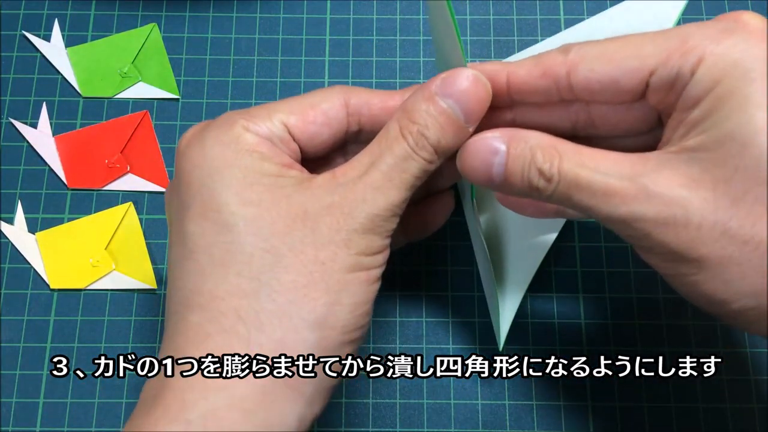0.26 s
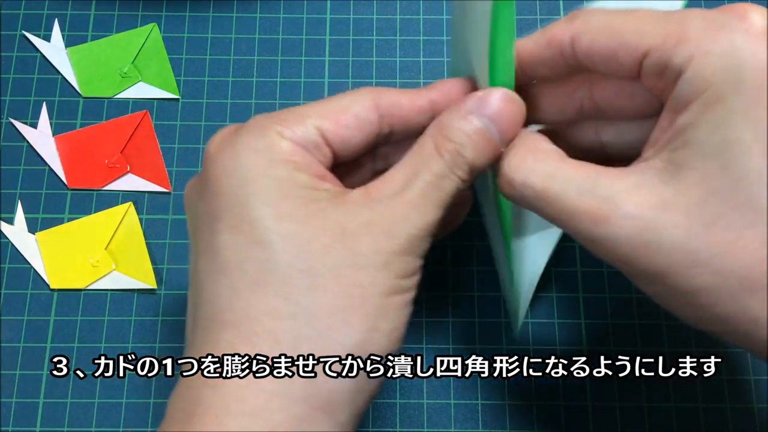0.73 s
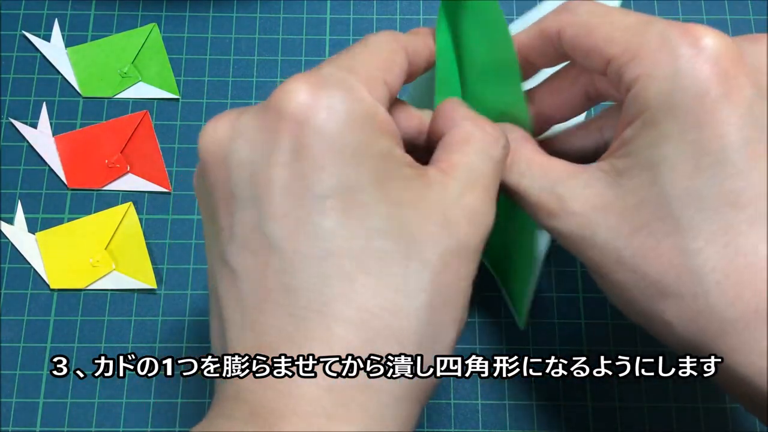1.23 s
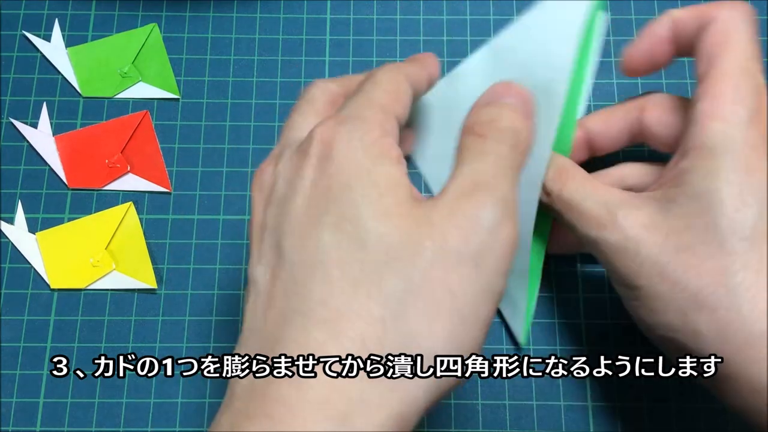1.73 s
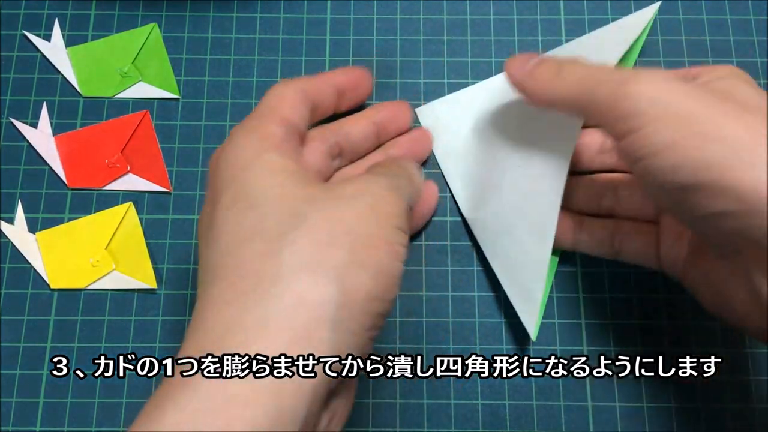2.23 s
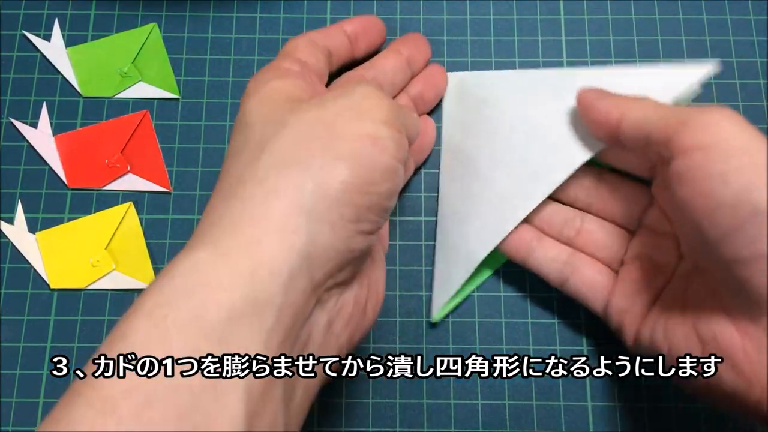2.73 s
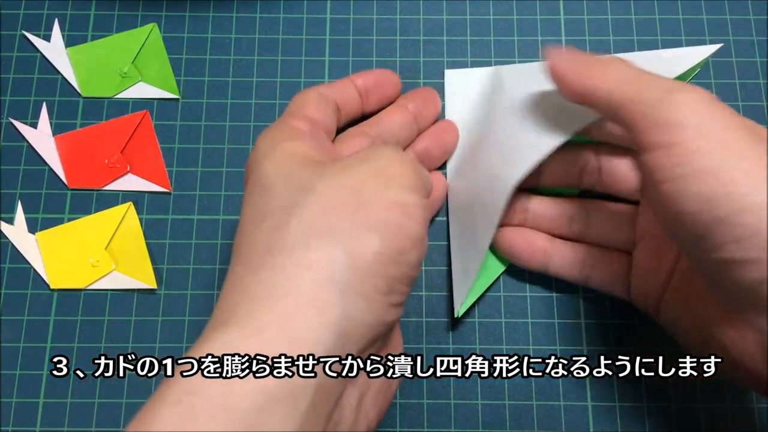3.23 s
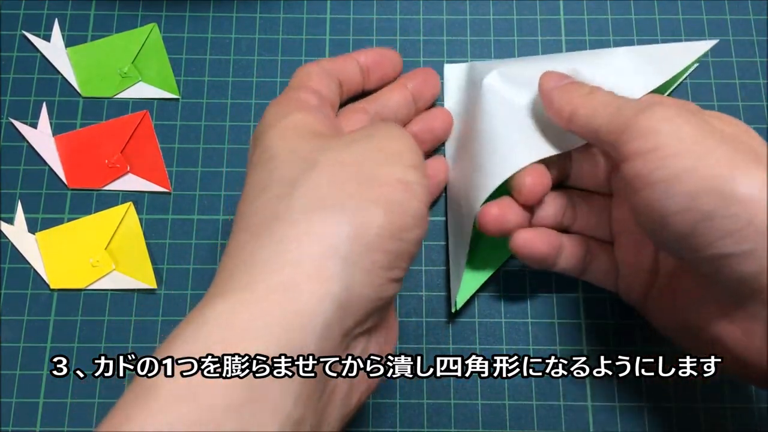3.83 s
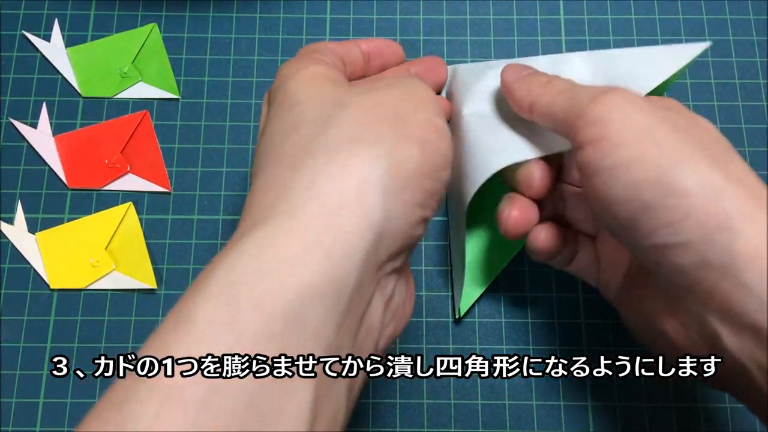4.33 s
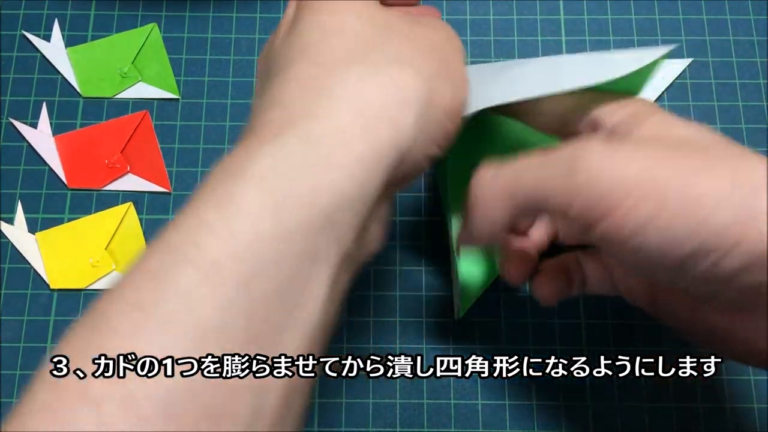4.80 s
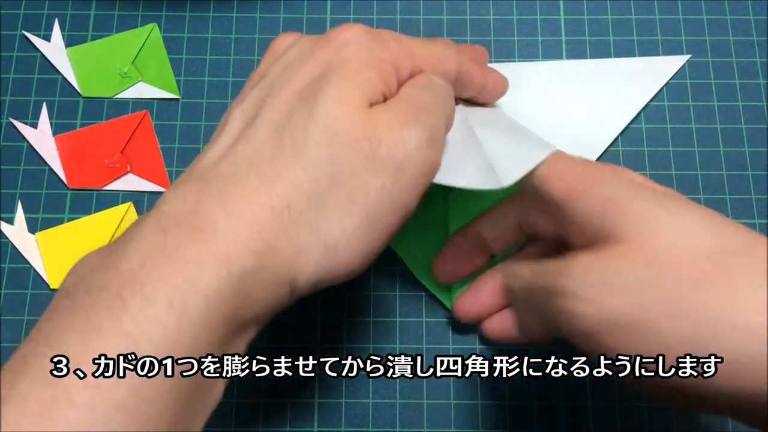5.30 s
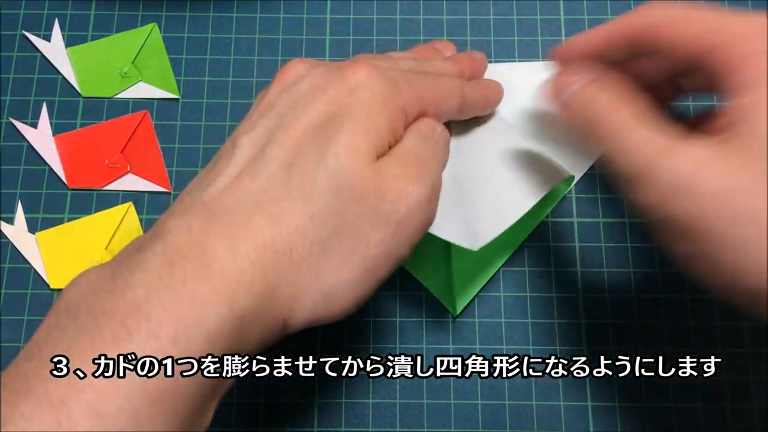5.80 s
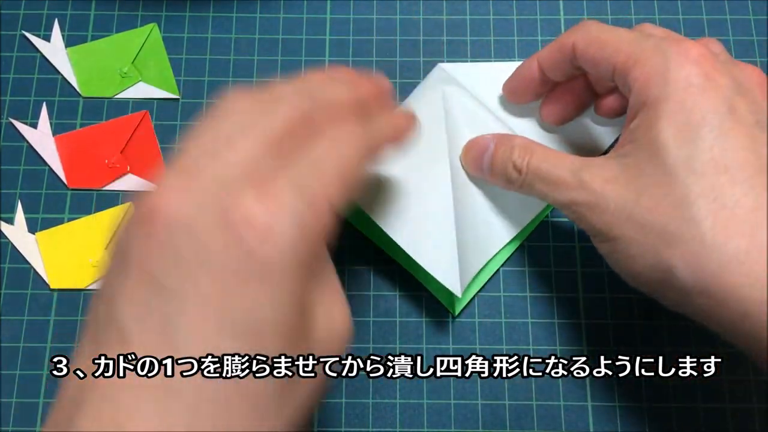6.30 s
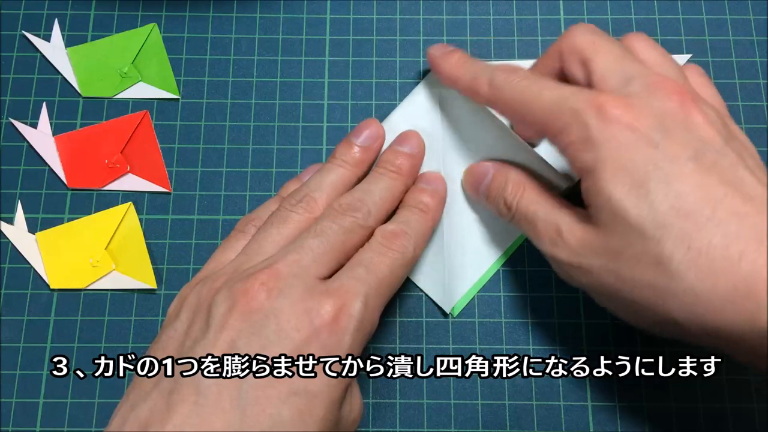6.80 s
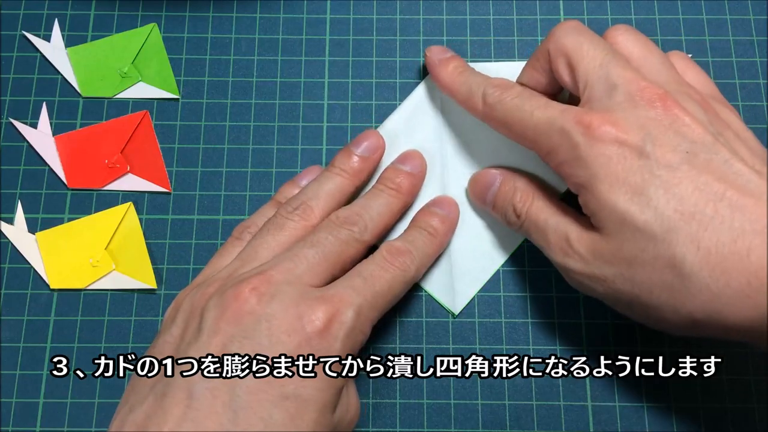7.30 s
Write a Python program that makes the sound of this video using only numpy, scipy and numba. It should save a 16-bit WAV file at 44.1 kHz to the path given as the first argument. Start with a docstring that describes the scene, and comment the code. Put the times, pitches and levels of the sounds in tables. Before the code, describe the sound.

Thin stiff paper crackles and rustles under sliding fingers, popping loudly as folds buckle, then settling into light pressing rubs over faint room hum.

```python
"""A quiet room, close to a desk mat: hands open, squash and crease a small sheet of paper.
Stick-slip friction of sliding fingers, heard as grainy rustles, shakes the modes of the sheet.
Buckling adds sharp snaps: one crack in a dying run of micro-cracks drives the same modes.
Hands press the desk with soft thumps, made as band-passed pushes of noise.
Desk and walls add a short diffuse tail to the paper, over a low hum of shaped noise."""
import sys
import numpy as np
from scipy import signal
from scipy.fft import rfft, irfft
from scipy.io import wavfile
from scipy.ndimage import uniform_filter1d
from numba import njit

SR = 44100
rng = np.random.default_rng(int(sys.argv[2]) if len(sys.argv) > 2 else 0)


def to_wav(s):
    """Save 16-bit WAV."""
    ch = np.atleast_2d(s).T  # columns
    pcm = np.round(np.clip(ch, -1, 1) * 32767)  # PCM
    wavfile.write(sys.argv[1], SR, pcm.astype(np.int16))


N = 332955


def undb(db):
    """Decibel law: amplitude gain of a level in dB."""
    return 10 ** (np.asarray(db) / 20)


def unit(x):
    """Normalisation of power: scale to rms 1."""
    return x / np.sqrt(np.mean(x ** 2))


def walk(rate_hz):
    """Random modulation: levels held for 1 / rate_hz, smoothed by two moving averages, rms 1."""
    hold = int(SR / rate_hz)
    steps = np.repeat(rng.standard_normal(N // hold + 1), hold)
    smooth = uniform_filter1d(uniform_filter1d(steps, hold), hold)
    return unit(smooth[:N])


# Spectrum of the room hum, interpolated over log frequency
# columns: frequency_hz [Hz], relative spectral level_db [dB]
HUM_SPECTRUM = [(30, -22.5), (46, -18), (64, 1), (87, -6), (124, -3.5), (161, -10), (198, -5), (300, -16),
                (900, -17.5), (1800, -18), (2700, -25.5), (5270, -34.5), (15300, -40.5)]
HUM_DB = -61.5


def hum():
    """Stationary noise of room and microphone: white noise shaped in spectrum, its level wavering slowly."""
    frequency_hz, level_db = np.transpose(HUM_SPECTRUM)
    bins_hz = np.fft.rfftfreq(N, 1 / SR)
    gain = undb(np.interp(np.log(bins_hz + 1), np.log(frequency_hz), level_db))
    waver_db = .8 * walk(2)
    noise = irfft(rfft(rng.standard_normal(N)) * gain, N)
    return undb(HUM_DB + waver_db) * unit(noise)


# How the sheet is held, interpolated over time
# columns: start_s [s], level_db of resting contact [dB], boom_db of the pocket over body [dB],
# pitch_hz of the taut panel [Hz], air_db added to the top register [dB]
GRIP = [(0, -93, -8.5, 3500, -2.5), (.8, -73, -5.5, 3100, 4), (1.25, -72, -10.5, 3000, -5.5),
        (1.43, -72, -5.5, 2500, 1.5), (1.7, -74, -2, 2400, 3.5), (1.9, -60, -7.5, 3400, -2),
        (2.6, -61, -13, 3660, 1.5), (2.71, -68, -12.5, 3660, -4), (3.05, -62.5, -5, 3650, -3),
        (3.3, -71, -6.5, 3700, -1.5), (3.5, -71, -18.5, 3200, 0), (3.62, -65.5, -8.5, 2200, -1.5),
        (4.1, -55.5, -2.5, 2100, -1), (4.4, -60, -3.5, 2000, -1.5), (4.56, -77, -2.5, 2450, 2.5),
        (5, -69, -4.5, 2900, 0.5), (5.3, -77.5, -4, 3500, -1), (5.8, -80, -3, 3000, -1.5),
        (6.2, -80, -5.5, 2337, 4.5), (6.6, -83, -4, 2300, 0), (6.8, -70, -12, 2600, -2.5),
        (6.949, -75.5, -14, 3495, -5), (7.05, -76, -12.5, 3040, -2), (7.24, -79, -13.5, 3900, -8.5),
        (7.5, -81, -19, 3100, -0.5)]


def held(t):
    """Changing boundary conditions: resting level, boom, panel pitch and air at the given times."""
    start_s, *columns = np.transpose(GRIP)
    return [np.interp(t, start_s, column) for column in columns]


# Finger strokes over the paper; the swell comes before the hold
# columns: start_s of the hold [s], hold_s [s], level_db of the body [dB], treble_db over body [dB],
# swell_ms [ms per 10 dB], fade_ms [ms per 10 dB]
FINGER_STROKES = [(0.02, .004, -63.5, -10, 12, 11), (0.064, 0.015, -58.5, 0.5, 10, 45),
                  (0.236, .005, -62.5, 6.5, 11, 12), (0.51, .01, -63, -3, 8.5, 56),
                  (0.695, .005, -48, -11, 3.8, 20), (0.787, .01, -62, -10, 13, 16),
                  (0.835, 0.018, -65, 2, 89, 65), (0.938, .005, -51, 3, 28, 68),
                  (1.04, 0.0089, -56, 6, 45, 17), (1.124, 0.033, -53.5, 8, 21, 29),
                  (1.208, 0.077, -53, 6, 49, 82), (1.485, .005, -40.5, -1.5, 99, 11),
                  (1.613, 0.03, -44, -1, 12, 64), (1.77, 0.015, -45.5, 0, 8.4, 51),
                  (1.993, .005, -42.5, 4, 86, 52), (2.188, .005, -46, 8.5, 67, 26),
                  (2.353, .005, -51, 4, 104, 28), (2.475, 0.0059, -50, 3.5, 46, 16),
                  (2.618, 0.14, -50.5, 6.5, 46, 77), (3.093, 0.15, -57, 5.5, 130, 44),
                  (3.345, 0.036, -52.5, 5, 15, 33), (3.389, 0.025, -43.5, -5, 19, 68),
                  (3.491, 0.017, -34, -10.5, 15, 25), (3.534, .015, -38.5, -9.5, 15, 21),
                  (3.593, .018, -35, -11.5, 9.8, 27), (3.638, 0.014, -38.5, -9, 15, 22),
                  (3.684, 0.026, -43.5, -2, 12, 35), (4.04, .005, -56.5, 4, 58, 140),
                  (4.199, 0.013, -58, 14.5, 50, 30), (4.258, 0.063, -45.5, -5, 15, 31),
                  (4.386, 0.056, -57, 0, 25, 25), (4.472, 0.037, -48, -7, 25, 20),
                  (4.569, 0.026, -45, 3, 35, 6), (4.666, 0.013, -58, -13, 12, 12),
                  (4.726, 0.13, -58, -1, 16, 60), (4.972, 0.043, -55, -6, 26, 45),
                  (5.063, .01, -53, -13, 19, 64), (5.204, .005, -60, 0.5, 17, 25),
                  (5.26, 0.39, -55.5, 3, 18, 20), (6.013, 0.0045, -61.5, 8.5, 7.9, 31),
                  (6.137, 0.13, -56, -1, 17, 8.6), (6.298, 0.0088, -61.5, -15, 7.6, 7.2),
                  (6.361, 0.011, -55.5, -12.5, 6.7, 5.1), (6.566, 0.031, -60.5, -12.5, 25, 16),
                  (6.647, 0.018, -52.5, -22, 8.5, 19), (6.789, 0.027, -48.5, 0.5, 62, 12),
                  (6.89, 0.039, -43, -8, 67, 9.1), (6.992, 0.082, -46.5, -6, 12, 14),
                  (7.109, 0.0089, -56, -2, 14, 13), (7.174, 0.025, -62, 7.5, 13, 27),
                  (7.223, 0.033, -54.5, -11, 10, 34), (7.376, 0.017, -62, 9, 12, 7.7),
                  (7.486, .005, -60.5, -8.5, 27, 9.7), (7.549, 0.0055, -67, -4, 18, 18)]
REST_TREBLE_DB = -4  # over the body of the resting contact


def strokes(t, rest_db):
    """Addition of powers: gains of body and treble as strokes swell, hold and fade over resting contact."""
    body_power = undb(rest_db) ** 2
    treble_power = undb(rest_db + REST_TREBLE_DB) ** 2
    for start_s, hold_s, level_db, treble_db, swell_ms, fade_ms in FINGER_STROKES:
        before_s = np.maximum(start_s - t, 0)
        after_s = np.maximum(t - start_s - hold_s, 0)
        drop_db = 10 * 1000 * (before_s / swell_ms + after_s / fade_ms)
        power = undb(level_db - drop_db) ** 2
        body_power = body_power + power
        treble_power = treble_power + power * undb(treble_db) ** 2
    return np.sqrt(body_power), np.sqrt(treble_power)


def grains(size, spread_db):
    """Skewed slip statistics: sizes of dense tiny fibre slips, a few much larger than the rest."""
    return undb(spread_db * rng.exponential(size=size))


@njit
def svf(x, hz, width):
    """Second-order resonance: state-variable band-pass with a moving centre, gain 1 there."""
    y, band, low = np.empty(len(x)), 0., 0.
    for i in range(len(x)):
        g, damping = np.tan(np.pi * hz[i] / SR), width[i] / hz[i]
        v = (band + g * (x[i] - low)) / (1 + g * (g + damping))
        band, low, y[i] = 2 * v - band, low + 2 * g * v, damping * v
    return y


def ring(x, hz, width):
    """Cascaded resonance: the band-pass applied twice for steeper skirts."""
    hz, width = hz + 0 * x, width + 0 * x  # one value per sample
    return svf(svf(x, hz, width), hz, width)


def modes(x, table, sway):
    """Modal superposition with alternating sign; sway() gives each mode its own change of level in dB."""
    total = 0
    for k, (pitch_hz, width_hz, level_db) in enumerate(table):
        mode = unit(ring(x, pitch_hz, 1.234 * width_hz))  # each pass is wider, as two narrow the band
        gain = undb(level_db + sway()) * np.sqrt(width_hz)
        total = total + (-1) ** k * gain * mode
    return total


# Modes of the sheet: the whole sheet, the fibres' treble, their top register, the folded pocket's lows
# columns of each: pitch_hz [Hz], nominal width_hz [Hz], relative level_db per root width [dB]
BODY_MODES = [(1830, 860, 0.5), (2850, 2910, -2.5), (3860, 1220, 3)]
SHEEN_MODES = [(5380, 9050, 6.5), (7120, 5000, 13.5)]
AIR_MODES = [(10200, 7900, 5.5), (14600, 7800, -0.5)]
BOOM_MODES = [(180, 190, -15.5), (347, 95, -3.5), (531, 130, -8), (643, 152, -9), (1157, 580, -0.5)]


def sheet(force, panel_hz, panel_db, air_db, sharp, sway):
    """Forced vibration: three forces drive three registers; the taut panel adds a resonance of Q sharp."""
    whole = unit(modes(force[0], BODY_MODES, sway))
    panel = unit(ring(force[0], panel_hz, panel_hz / sharp))
    body = whole + undb(panel_db + sway()) * panel
    treble = modes(force[1], SHEEN_MODES, sway) + undb(air_db) * modes(force[1], AIR_MODES, sway)
    boom = modes(force[2], BOOM_MODES, sway)
    return unit(body), unit(treble), unit(boom)


FIRM_DB, BOOM_LAG = -54, 0.19  # body level where boom is as listed; dB it lags per dB above


def rustle(t):
    """Stick-slip friction: skin grips and slips in grainy, fluttering force with scattered crackles."""
    rest_db, boom_db, panel_hz, air_db = held(t)
    firm, bright = strokes(t, rest_db)
    hits = rng.random(N) < 300 / SR  # 300 crackles per second on average
    ticks = hits * undb(-11 + np.minimum(4.0 * rng.exponential(size=N), 14))
    crackle = 1 + signal.lfilter([1], [1, -np.exp(-1 / (0.0026 * SR))], ticks)  # each decays in 2.6 ms
    flutter_db = 0.79 * walk(60) + 0.66 * walk(250)
    push = grains(size=N, spread_db=2.0) * undb(flutter_db) * crackle
    force = push * rng.standard_normal((3, N))
    # the bending sheet lets each mode swell and fade on its own
    body, treble, boom = sheet(force, panel_hz, panel_db=-1.0, air_db=air_db, sharp=2.6,
                               sway=lambda: 2.3 * walk(35))
    boom_gain = undb(boom_db) * (firm / undb(FIRM_DB)) ** -BOOM_LAG
    return firm * (body + boom_gain * boom) + bright * treble


# Buckling snaps
# columns: start_s [s], level_db of the body [dB], treble_db over body [dB],
# pitch_hz of the ringing panel [Hz], length_ms, the time scale of the run [ms]
BUCKLES = [(0.0756, -47.5, 3, 4470, 11), (0.144, -50, -4, 4600, 11), (0.157, -44, -10, 4250, 8.5),
           (0.3685, -66, 18.5, 5100, 3), (0.4687, -55, 13, 4580, 3.9), (0.5172, -42, 7, 4320, 4.4),
           (0.572, -67.5, 21, 4900, 4.6), (0.5918, -35.5, 0.5, 4670, 4.6), (0.608, -47, -2, 5030, 3.4),
           (0.627, -48, 6, 4300, 2.6), (0.635, -48, 0, 4260, 7.5), (0.6768, -47.5, 5, 4500, 2.7),
           (0.6987, -43, -17, 1870, 5.4), (0.728, -51, -5, 1310, 12), (0.845, -43.5, -17, 960, 3.5),
           (0.9336, -40, 0, 2420, 12), (0.981, -47.5, 2, 4150, 13), (0.993, -39, 10, 5700, 2.6),
           (1.0363, -37.5, -5, 1160, 10), (1.053, -22.5, -11, 3380, 1.6), (1.106, -32.5, -12, 3930, 4.7),
           (1.1403, -27, -5.5, 4420, 6), (1.2355, -21, 0.5, 6000, 6.6), (1.277, -31, -1.5, 4070, 3.5),
           (1.315, -38, -35, 900, 17), (1.3366, -29, 3.5, 4300, 3.6), (1.3498, -31.5, -14, 4450, 3.6),
           (1.4112, -19, -3, 1900, 4.2), (1.4327, -13.5, -9, 4000, 2.8), (1.4437, -12.5, 2, 1980, 3.1),
           (1.4543, -23.5, -5, 1700, 7.2), (1.534, -42, 11.5, 3520, 2.3), (1.5731, -44, -9, 3220, 9.7),
           (1.6772, -26, -22, 1090, 2.9), (1.7861, -32.5, -30, 2090, 15.5), (1.825, -42, -30, 920, 11),
           (1.9857, -30, -1, 3150, 32), (2.0, -25.5, 1, 4300, 6.5), (2.03, -32, -1, 3500, 2),
           (2.0506, -22.5, -1.5, 4540, 12.8), (2.117, -46, 3, 3500, 10), (2.129, -33.5, -37, 1080, 5.3),
           (2.191, -37, -24, 3020, 10), (2.2093, -26.5, -2.5, 2600, 14), (2.33, -36, 14.5, 3830, 1.2),
           (2.3385, -25.5, 6.5, 3600, 1.8), (2.6067, -40, 18, 4240, 0.91), (2.619, -51, 15, 3220, 4),
           (2.654, -50.5, 16.5, 4500, 2.2), (2.707, -12, -1.5, 3400, 3.7), (2.717, -9, -7, 3670, 3.6),
           (2.7801, -30, -20, 3700, 10), (2.837, -21, -37, 3280, 2.6), (2.928, -38, -35, 1180, 4.2),
           (3.0266, -30.5, -28, 3300, 5.3), (3.0385, -22, -31, 4060, 2.6), (3.0441, -21, -6, 3370, 5.1),
           (3.0559, -29.5, -13, 1150, 10), (3.2365, -19, 4, 4030, 3.9), (3.7441, -29, -31, 2000, 5.5),
           (3.768, -39, -24, 2100, 6.4), (3.885, -44, -29, 1800, 4.8), (3.9058, -39.5, -23, 2320, 2.4),
           (3.981, -43, -22, 1870, 4.9), (4.038, -45, 7.5, 4400, 26), (4.124, -28.5, -42, 1900, 8.8),
           (4.1521, -37.5, -19, 1070, 9.5), (4.236, -42, -22, 2900, 4.6), (4.254, -26.5, -28, 3000, 6.3),
           (4.2769, -27.5, -7, 2960, 4.4), (4.335, -36, -8, 1420, 3.9), (4.3607, -32.5, -12, 2330, 10.6),
           (4.4513, -39, -21, 1340, 17), (4.459, -42, 13.5, 1150, 1.9), (4.473, -23.5, -14, 2030, 6.2),
           (4.495, -37, -25, 2000, 5), (4.511, -38, -25, 1890, 8.4), (4.545, -45, 9, 5200, 5.4),
           (4.5565, -7.5, -2.5, 2720, 3.7), (4.725, -46.5, -19, 3420, 4), (4.801, -48.5, -20, 2000, 17),
           (4.8315, -34, -15, 1060, 2.7), (4.869, -32, -19, 1070, 9.7), (4.877, -25.5, -8, 3240, 9.8),
           (4.888, -33, -0.5, 3060, 10), (5.1356, -57.5, 11, 5750, 21), (5.245, -23.5, -2, 4650, 7.5),
           (5.29, -42.5, 6, 1120, 2.4), (5.4376, -27, -9, 1200, 0.4), (5.572, -45, -25, 1070, 12),
           (5.6238, -22.5, -9, 1110, 6.8), (6.52, -47, -31, 3004, 2.6), (6.6951, -26, -33, 2100, 3.5),
           (6.9517, -17, -4.5, 1107, 3.2), (7.2604, -34, -20, 1260, 6.9), (7.2671, -16.5, -0.5, 2600, 2.7),
           (7.333, -45, -7, 2960, 8)]
CRACK_S, CRACK_DB = .0006, 15.5  # main crack: delay in s, and size over a unit of micro-crack force
# a snap's boom over that of the pocket for a 2500 Hz panel; small, high panels boom less
SNAP_BOOM_DB, BOOM_DB_PER_OCTAVE = -1, -2


def snaps():
    """Buckling instability: one strong crack in a sudden, dying run of micro-cracks; the pocket booms along."""
    out, t = np.zeros(N + SR), np.arange(SR // 16) / SR
    for start_s, level_db, treble_db, pitch_hz, length_ms in BUCKLES:
        age = 1000 * t / max(length_ms, .5)
        rise = 1 - np.exp(-age / 0.025)  # longer runs also start more softly
        fade = rise * np.exp(-1.4 * age)
        force = fade * grains(size=len(t), spread_db=2.0) * rng.standard_normal((3, len(t)))
        force[:, int(CRACK_S * SR)] = undb(CRACK_DB)
        _, pocket_db, _, air_db = held(start_s)
        body, treble, boom = sheet(force, pitch_hz, panel_db=1.0, air_db=air_db, sharp=3.1, sway=lambda: 0)
        boom_db = pocket_db + SNAP_BOOM_DB + BOOM_DB_PER_OCTAVE * np.log2(pitch_hz / 2500)
        mix = body + undb(treble_db) * treble + undb(boom_db) * boom
        i = int(start_s * SR)
        out[i:i + len(t)] += undb(level_db) * np.sqrt(np.mean(fade ** 2)) * mix
    return out[:N]


# Hands landing or dragging on the desk
# columns: start_s [s], level_db [dB], pitch_hz of the dull band [Hz], push_ms from start to peak [ms]
DESK_THUMPS = [(1.44, -71, 171, 11), (1.79, -45, 284, 14), (2.145, -50, 122, 7.6), (2.777, -51.5, 153, 24),
               (4.121, -52, 120, 8.9), (4.555, -54, 170, 11), (4.77, -53, 149, 23), (4.871, -53, 121, 23),
               (4.94, -51, 201, 41), (5.059, -45, 182, 7.2), (5.286, -48, 317, 3.9),
               (6.008, -51, 147.5, 9.7), (6.167, -53.5, 330, 7.3)]


def thumps(t):
    """Damped forced vibration: soft pushes of a palm shake the desk top in a dull band."""
    out, span = np.zeros(N + SR), t[:SR // 4]
    for start_s, level_db, pitch_hz, push_ms in DESK_THUMPS:
        age = 1000 * span / push_ms
        push = age * np.exp(1 - age)  # peaks at 1
        shake = ring(push * rng.standard_normal(len(span)), pitch_hz, 1.1 * pitch_hz)
        i = int(start_s * SR)
        out[i:i + len(span)] += undb(level_db) * np.sqrt(np.mean(push ** 2)) * unit(shake)
    return out[:N]


# Reverberant tails of the desk, then the walls
# columns: t60_s, time to fall 60 dB [s], level_db of the tail's energy over the direct sound [dB]
ECHO_TAILS = [(.085, -12), (0.299, -21)]


def room(x):
    """Diffuse reverberation: echoes that begin after a millisecond and decay exponentially at two rates."""
    t = np.arange(SR // 3) / SR
    echo = 0
    for t60_s, level_db in ECHO_TAILS:
        decay = np.exp(-np.log(1000) * t / t60_s)
        tail = rng.standard_normal(len(t)) * decay * (t > .001)
        echo = echo + undb(level_db) * tail / np.sqrt(np.sum(tail ** 2))
    return x + signal.fftconvolve(x, echo)[:N]


def scene():
    """Linear superposition: paper with its reverberation, over dry thumps and hum."""
    t = np.arange(N) / SR
    paper = room(snaps() + rustle(t))
    return (paper + thumps(t) + hum())[None]


TOP_HZ = 16300


def record(dry):
    """Saturation and band limiting: the recorder rounds the loudest snaps and cuts the top."""
    rounded = .9 * np.tanh(dry / .9)
    low_pass = signal.ellip(10, .2, 80, TOP_HZ, fs=SR, output="sos")
    return signal.sosfilt(low_pass, rounded)


dry = scene()
out = record(dry)
to_wav(out)
```